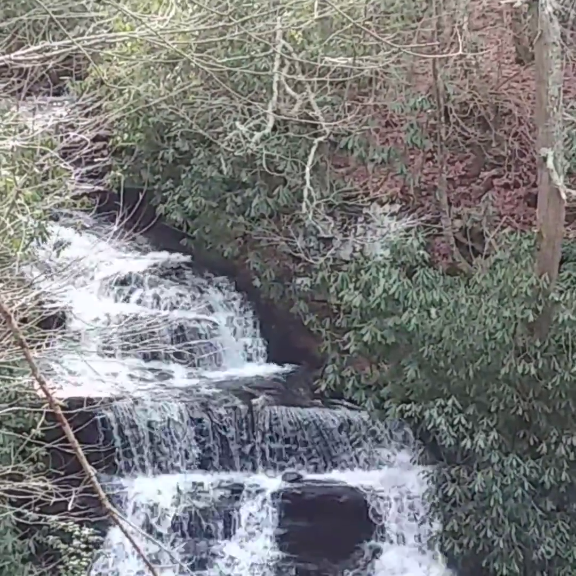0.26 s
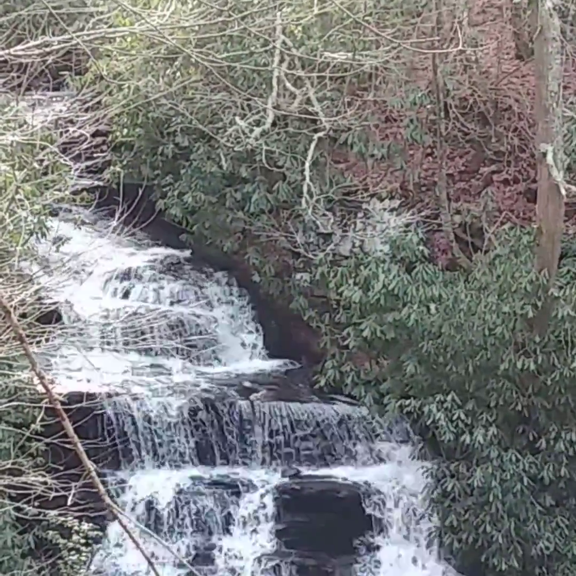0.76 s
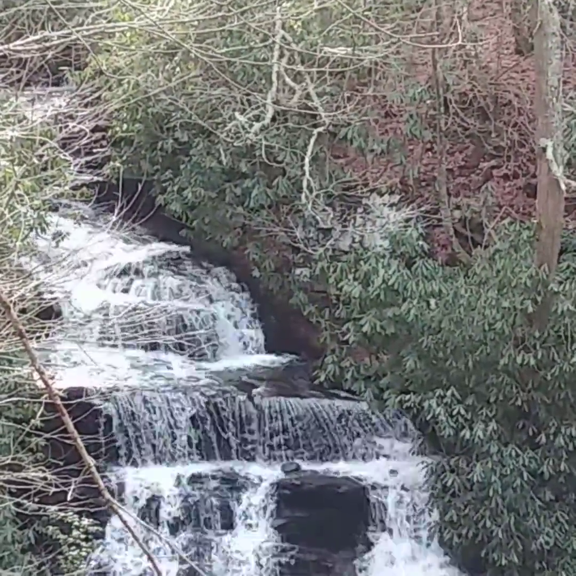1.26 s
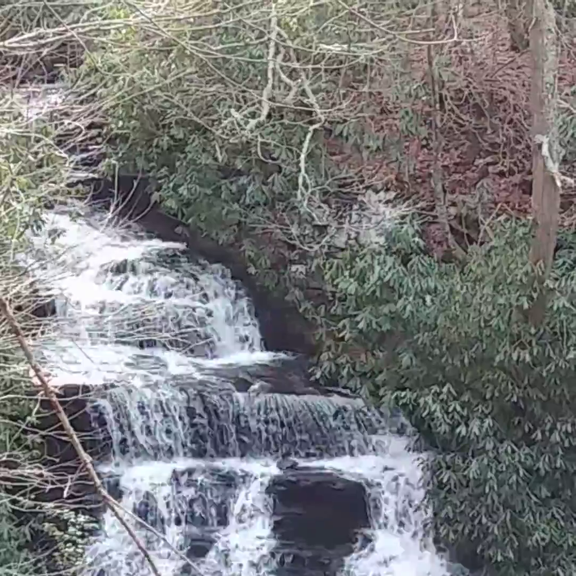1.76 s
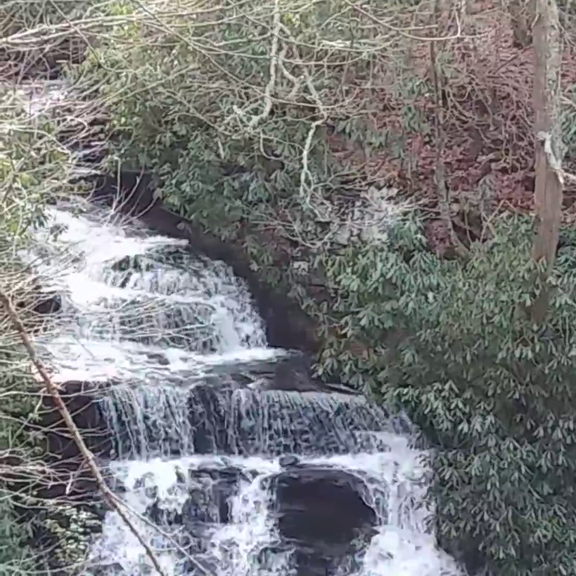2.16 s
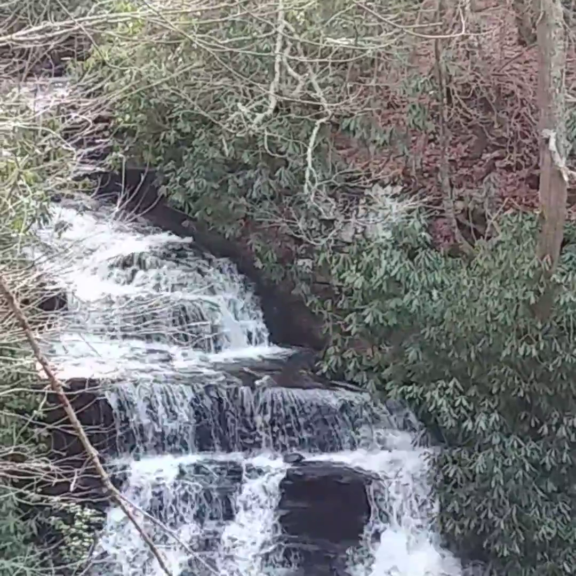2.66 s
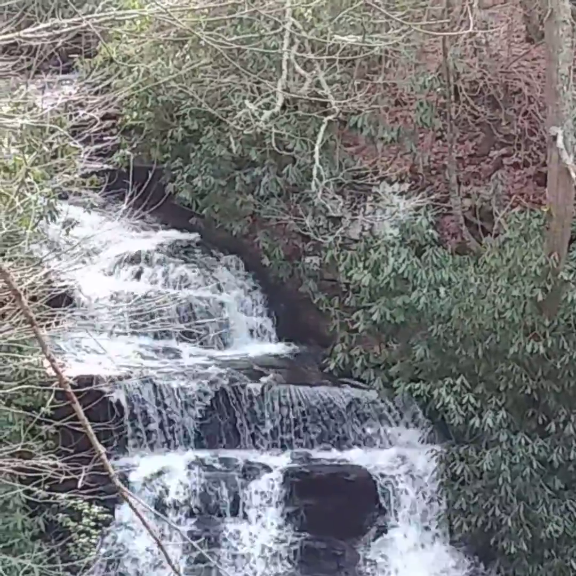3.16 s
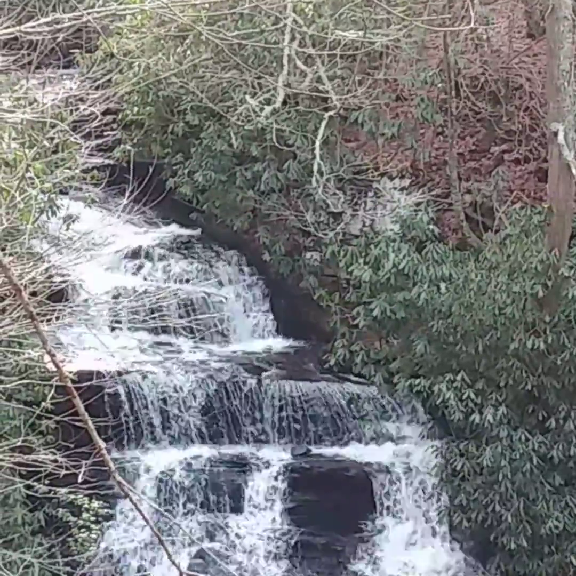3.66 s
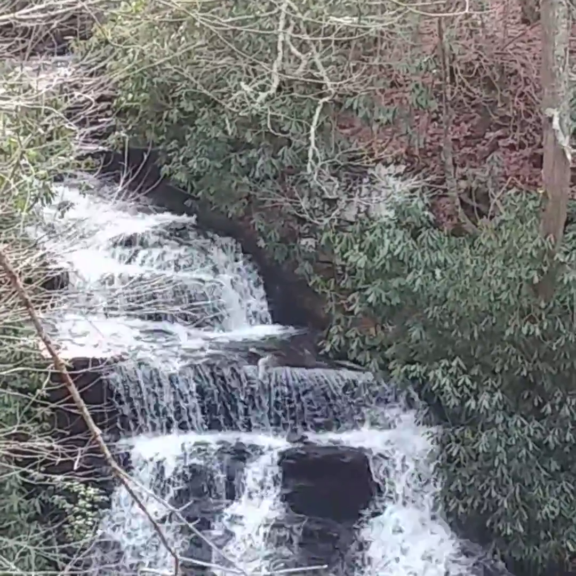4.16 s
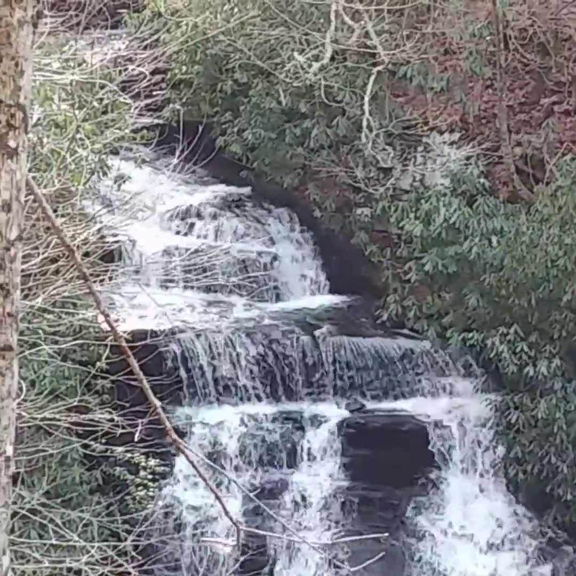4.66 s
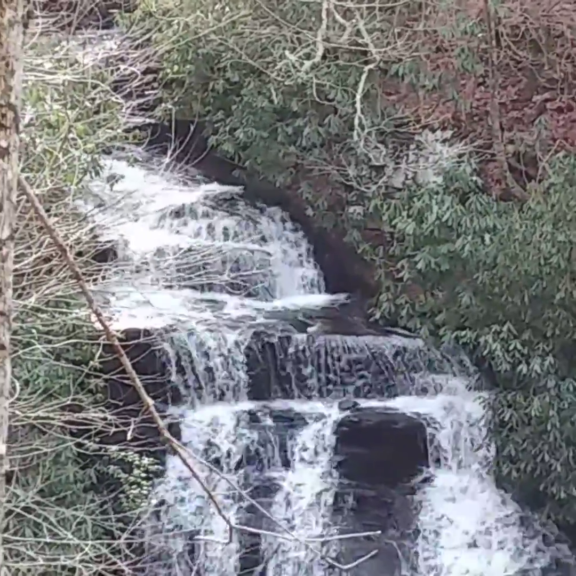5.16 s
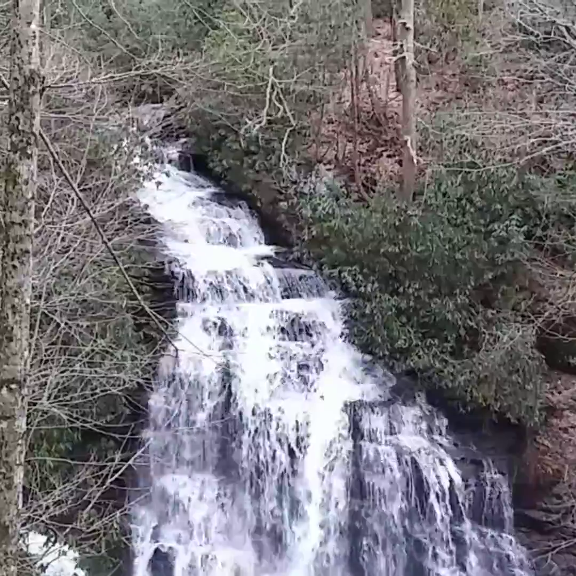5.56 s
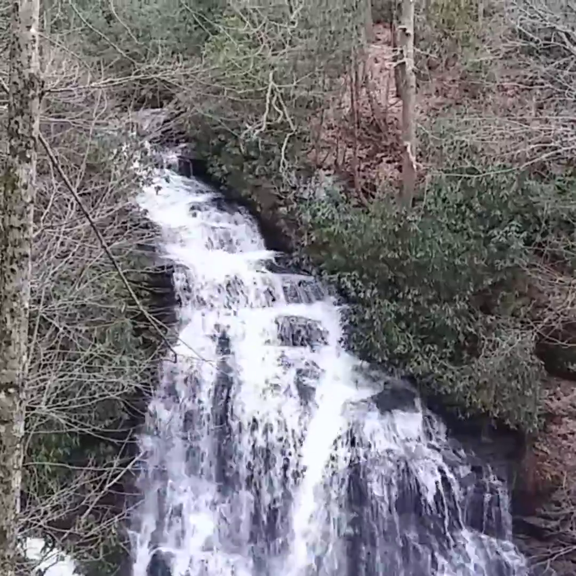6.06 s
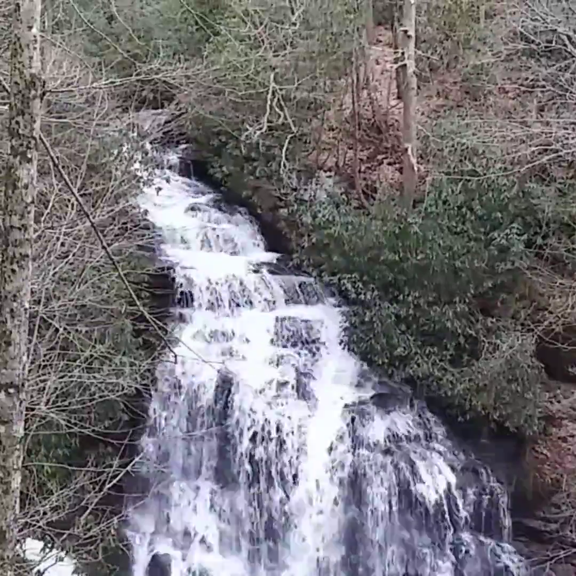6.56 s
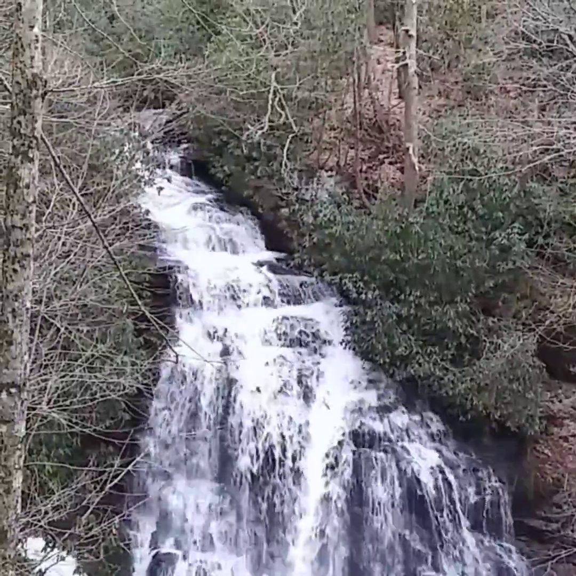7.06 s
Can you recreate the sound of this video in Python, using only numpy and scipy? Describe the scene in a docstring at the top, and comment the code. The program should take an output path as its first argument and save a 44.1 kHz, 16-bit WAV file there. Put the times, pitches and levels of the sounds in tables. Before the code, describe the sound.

A waterfall rushes steadily over rock ledges, drops out for an instant, then returns with slightly more rumble.

```python
"""A cascade over rock ledges in a forest, heard from across the gorge through one phone microphone.
Countless bursting bubbles and fine spray merge into a smooth rush, which sounds close for five seconds.
The listening spot then jumps to a duller one for a moment, and a short silence follows.
Last, the rush fades in at a wider spot with more rumble from the pool where the water lands."""
import sys
import numpy as np
from scipy import signal
from scipy.fft import rfft, irfft, next_fast_len
from scipy.io import wavfile
from scipy.ndimage import uniform_filter1d

SR = 44100
rng = np.random.default_rng(int(sys.argv[2]) if len(sys.argv) > 2 else 0)


def waveform_to_disk(signal):
    """Save audio, clipped to [-1, 1], as 16-bit WAV at the path in sys.argv[1]."""
    frames = np.transpose(np.atleast_2d(signal))
    scaled = np.clip(frames, -1, 1) * 32767
    samples = np.round(scaled).astype(np.int16)
    wavfile.write(sys.argv[1], SR, samples)


N = 322371
FFT_SIZE = next_fast_len(N)
PITCHES_HZ = np.maximum(np.arange(FFT_SIZE // 2 + 1) * SR / FFT_SIZE, 1)
JUMP_S, STOP_S, FADE_START_S = 5.271, 5.425, 5.457


def undb(db):
    """Turn decibels into a number to multiply by."""
    return 10 ** (np.asarray(db) / 20)


def unit(x):
    """Scale a signal to an average strength (rms) of 1."""
    return x / np.sqrt(np.mean(x ** 2))


def wander(turns_per_s):
    """A curve that drifts smoothly between random values."""
    hold = int(SR / turns_per_s)
    steps = np.repeat(rng.standard_normal(N // hold + 1), hold)
    return unit(uniform_filter1d(uniform_filter1d(steps, hold), hold)[:N])


def colour(sound, tone, hollows=()):
    """Make some pitches stronger than others, then scale the result to strength 1."""
    pitch_hz, level_db = np.transpose(tone)
    shape_db = np.interp(np.log(PITCHES_HZ), np.log(pitch_hz), level_db)
    for centre_hz, width_hz, depth_db in hollows:
        shape_db -= depth_db / (1 + (2 * (PITCHES_HZ - centre_hz) / width_hz) ** 2)
    return unit(irfft(rfft(sound, FFT_SIZE) * undb(shape_db), FFT_SIZE)[:N])


def bursting_bubbles(bursts_per_s=3000, spread_db=2):
    """Each bubble bursts with one tiny click; most are weak, a few are strong."""
    chance, direction, size = rng.random((N, 3)).T
    bursts = chance < bursts_per_s / SR
    strength = undb(-spread_db * np.log(size + 1e-9))
    return unit(bursts * np.sign(direction - .5) * strength)


def white_water(bubbles_db=-10, surge_db=.15, sway_db=.2, flicker_db=.3):
    """Spray and bubbles, one octave band at a time: big bubbles sound low, small ones high."""
    water = 0
    surge, sheet = wander(1.59), wander(5)  # the surge of the flow moves all bands together
    for octave in range(4, 16):  # bands centred on 2 ** octave Hz
        bubbles = undb(bubbles_db) * bursting_bubbles()
        spray = rng.standard_normal(N)
        # the bands overlap so that together they cover all pitches evenly
        window = np.cos(np.pi / 2 * np.clip(np.log2(PITCHES_HZ) - octave, -1, 1))
        band = irfft(rfft(spray + bubbles, FFT_SIZE) * window, FFT_SIZE)[:N]
        sheet = unit(sheet + wander(4.44))  # a sheet of falling water sways nearby bands alike
        wobble_db = surge_db * surge + sway_db * sheet + flicker_db * wander(14)
        water = water + undb(wobble_db) * band
    return water


# Tone of the rush at the duller spot: pitch_hz, level_db
DULL_TONE = [(35, -58), (60, -32), (250, -6), (475, -8), (700, -4), (1120, -9), (1550, -2.5), (2470, -4),
             (4300, -12.5), (5800, -12), (7550, -4.5), (9000, -18), (12000, -32), (15500, -44)]


def dull_rush(water, t, level_db=-21, cut_s=.0007, tail_db=-35.5, fall_db_per_s=900):
    """A moment of duller water that cuts off, leaving a faint tail that dies away."""
    since_stop = np.maximum(t - STOP_S, 0)
    cut = np.exp(-since_stop / cut_s)
    tail = undb(tail_db - fall_db_per_s * since_stop)
    return (t >= JUMP_S) * np.maximum(cut, tail) * undb(level_db) * colour(water, DULL_TONE)


# Tone of the rush with the rumble of the pool: pitch_hz, level_db
POOL_TONE = [(15, -72), (25, -46), (48, -38), (100, -24.5), (209, -5.5), (331, -5.5), (410, -12),
             (582, -6.5), (1170, -6), (2420, -4.5), (3830, -11.5), (5000, -14.5), (5650, -16.5),
             (6400, -8.5), (7310, -4), (8140, -8), (9060, -20.5), (10000, -21.5), (11000, -34),
             (12200, -37), (13800, -36), (15500, -44)]
# Sudden dips in loudness during the fade-in: start_s, depth_db
FADE_DIPS = [(5.518, 3), (5.578, 2)]


def pool_rush(water, t, level_db=-19.5, fade_s=.23, recovery_s=.047):
    """Water plunging into the pool adds rumble; the sound fades in with two brief dips."""
    rise = np.clip((t - FADE_START_S) / fade_s, 0, 1) ** .65  # quick at first, then slower
    dip_db = 0
    for start_s, depth_db in FADE_DIPS:
        since_dip = np.maximum(t - start_s, 0)
        dip_db += (t >= start_s) * depth_db * np.exp(-since_dip / recovery_s)
    return rise * undb(level_db - dip_db) * colour(water, POOL_TONE)


# Tone of the rush close to the ledges: pitch_hz, level_db
LEDGE_TONE = [(15, -75), (25, -47), (48, -46), (96, -23), (144, -19.5), (190, -11), (289, -5), (600, -7),
              (850, -7), (1200, -4.5), (2000, -3), (4500, -5), (6000, -6.5), (7500, -3), (8590, -10.5),
              (9500, -20.5), (10800, -27), (12000, -38), (15500, -47)]
# Pitches weakened by sound bouncing off the phone or the hand: pitch_hz, width_hz, depth_db
BOUNCE_HOLLOWS = [(430, 156, 6), (3102, 850, 12), (5770, 730, 12.5)]


def ledge_rush(water, t, level_db=-19.5):
    """The main sound: water breaking over the rock ledges in a close, steady rush."""
    return (t < JUMP_S) * undb(level_db) * colour(water, LEDGE_TONE, BOUNCE_HOLLOWS)


def scene():
    """The same water heard from three spots in turn, alike on both channels."""
    t = np.arange(N) / SR
    water = white_water()
    rush = ledge_rush(water, t) + dull_rush(water, t) + pool_rush(water, t)
    return np.tile(rush, (2, 1))


def record(dry):
    """The phone steeply cuts off the very highest pitches."""
    top_hz = 15740
    return signal.sosfilt(signal.ellip(16, .3, 70, top_hz, fs=SR, output="sos"), dry)


dry = scene()
out = record(dry)
waveform_to_disk(out)
```